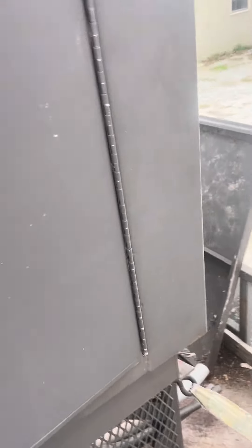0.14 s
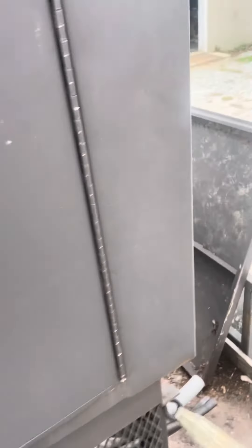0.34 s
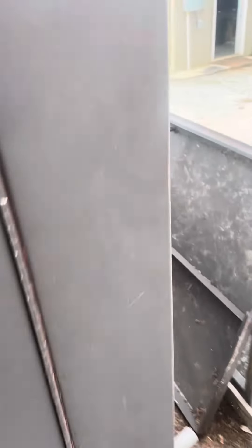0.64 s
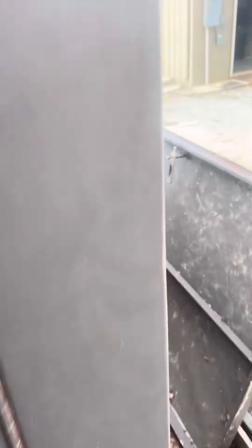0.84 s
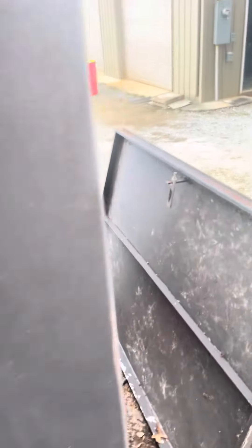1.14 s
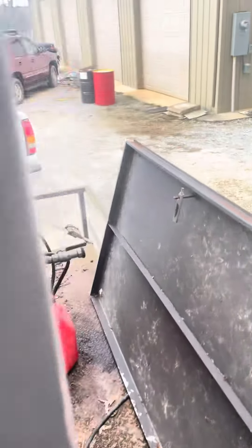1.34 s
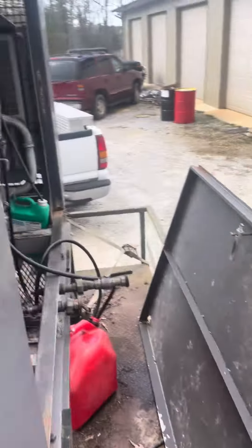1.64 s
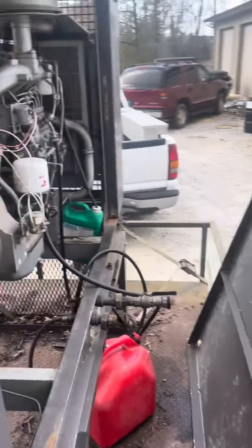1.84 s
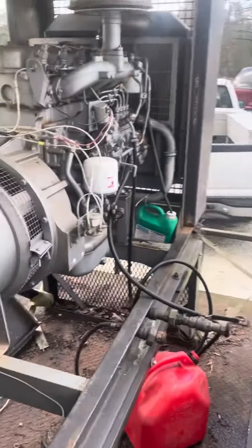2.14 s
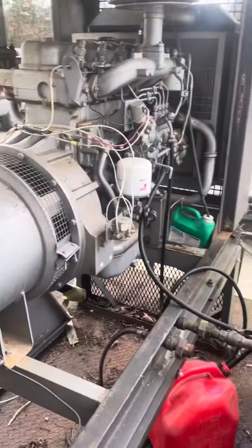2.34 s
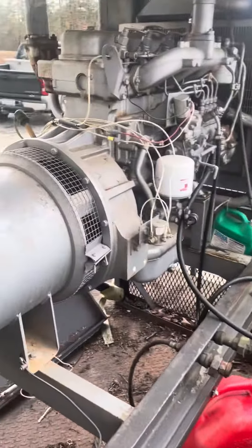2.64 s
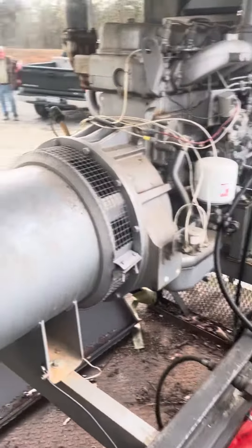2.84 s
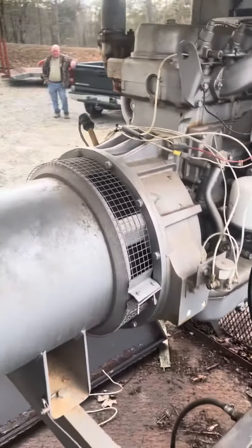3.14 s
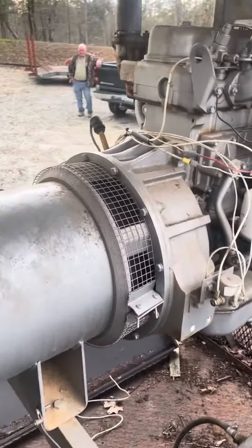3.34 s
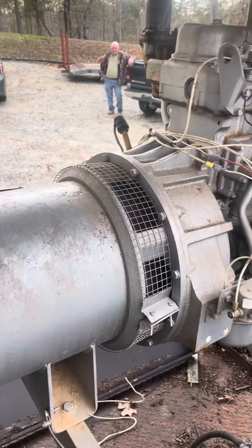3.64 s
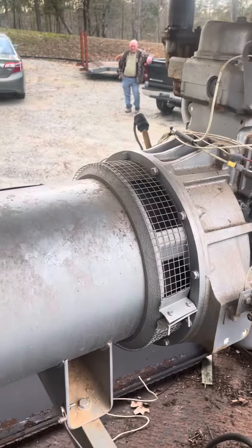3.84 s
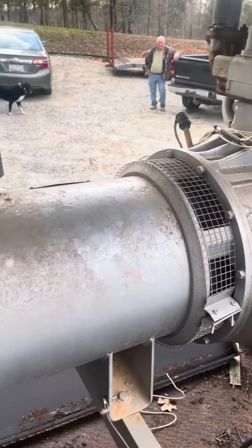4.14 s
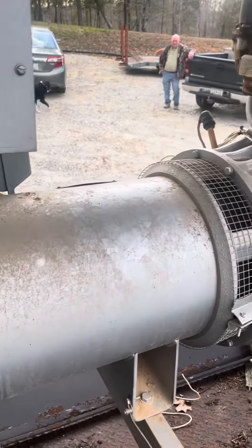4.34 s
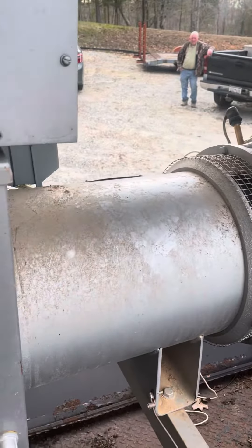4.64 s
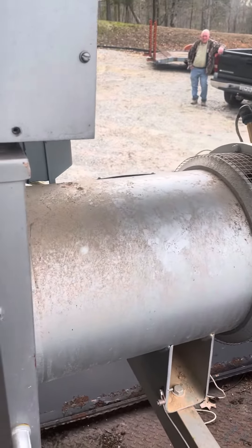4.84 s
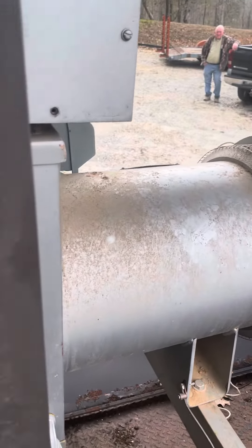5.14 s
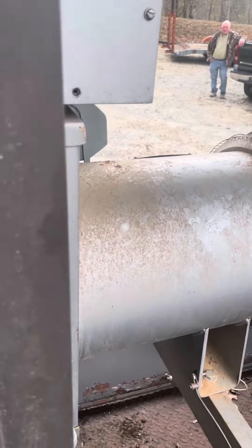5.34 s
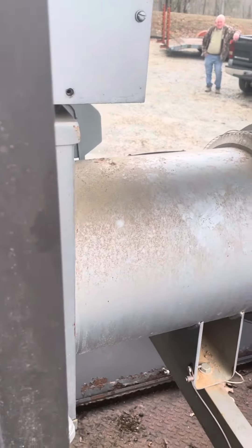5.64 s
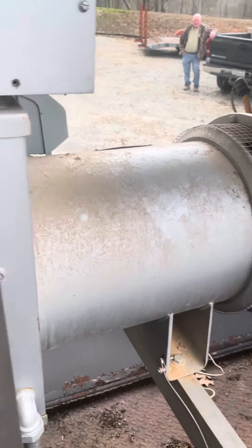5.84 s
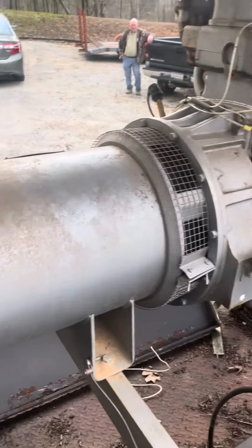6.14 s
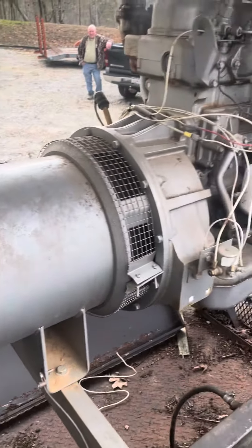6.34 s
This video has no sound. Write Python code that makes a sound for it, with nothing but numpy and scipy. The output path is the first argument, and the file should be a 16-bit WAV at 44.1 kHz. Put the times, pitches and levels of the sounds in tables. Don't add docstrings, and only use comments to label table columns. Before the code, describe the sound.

A diesel generator is already running at a fixed speed, around thirty turns a second, and never stops. From 0 to 1.2 s a steel door partly masks it: a low firing hum near 60 Hz, a fan whine near 370 Hz, dull air roar, and brief thin whistle glints around 4.5 kHz. From about 1.3 to 2 s the listener steps clear; the roar brightens with a rising reflected color and the rapid block clatter opens up. Between 2 and 4 s it is full and close, the whine prominent, with tones dipping and returning. Deep exhaust booms swell at about 2.5 and 3.6 s, strongest from 4 to 5.1 s, while firing hum and whine weaken along the alternator. A barely audible tick falls at 4 s, a slightly firmer one at 6.2 s. The whine recovers somewhat toward the end, and the sound cuts off still running at 6.5 s. Wide outdoor stereo.

```python
import sys
import numpy as np
from scipy import signal
from scipy.fft import rfft, irfft, next_fast_len
from scipy.io import wavfile
from scipy.ndimage import uniform_filter1d, map_coordinates

SR = 44100
rng = np.random.default_rng(int(sys.argv[2]) if len(sys.argv) > 2 else 0)


def int16_out(signal):
    q = np.round(np.clip(np.atleast_2d(signal).T, -1, 1) * 32767)
    wavfile.write(sys.argv[1], SR, q.astype(np.int16))


def makeup_ratio(level_db):
    decades = np.asarray(level_db, float) / 20
    return 10 ** decades


N = 286209
FFT_SIZE = next_fast_len(N + 8192)
HZ = np.arange(FFT_SIZE // 2 + 1) * SR / FFT_SIZE

# [t/s, turns per second/Hz]
SPEED = [(0, 30.59), (1.3, 30.58), (1.6, 30.7), (2.1, 30.56), (2.5, 30.63), (3, 30.59), (5, 30.59),
         (5.6, 30.62), (6.49, 30.62)]
# [t/s, place along the set/m, share of the set hidden by door or frame/0-1]
WALK = [(0, 0.8, 0.9), (.1, 0.3, 1), (.7, -0.03, 0.8), (.98, 0.44, .75), (1.05, -0.7, 0.87),
        (1.279, -.1, 0.5), (1.48, -0.5, 0.15), (2.13, 0.5, .2), (2.8, 1.5, .1), (3.43, 2, 0.05),
        (4.2, 2.5, 0.01), (4.86, 3, 0.04), (5.101, 3.5, .3), (5.73, 3.5, .2), (5.84, 4, 0.3),
        (6.2, 3.5, 0.5), (6.49, 2.9, 0.3)]


def in_time(rows):
    s, *columns = np.transpose(rows)
    return np.array([np.interp(np.arange(N) / SR, s, c) for c in columns])


def drift(rate):
    r = np.exp(-80 * np.pi * rate / SR)
    slow = signal.lfilter([1], [1, -2 * r, r * r], rng.standard_normal(N // 40 + 2002))[2000:]
    return np.interp(np.arange(N) / 40, np.arange(len(slow)), slow / slow.std())


def bump(s, half_s):
    return np.exp(-((np.arange(N) / SR - s) / half_s) ** 2)


def heard_db(place_m, distance_m, hidden_db):
    walker_m, hidden = in_time(WALK)
    return -10 * np.log10(1 + ((walker_m - place_m) / distance_m) ** 2) - hidden_db * hidden


def ports(hz):
    # [f/Hz, level per Hz/dB, left-right/dB, likeness/0-1, left lead/rad]
    set_colour = [(35.7, -69.5, 3, 1, 2.5), (48, -57, 0, 0.65, .0), (75, -47.5, .8, .995, .0),
                  (101, -50, 0, 0.77, 0.7), (131, -54.5, 1, .95, -0.5), (186, -47, -4.5, 0.96, 0.28),
                  (310, -46, -4.5, 0.9, 0.46), (467, -48.5, -3, .72, 1.23), (547, -51, 2.5, 0.7, 1.22),
                  (734, -50.5, -0.2, .74, 1.97), (734, -48, 1.5, .84, 2), (827, -53.5, 3, .66, 2),
                  (1040, -54.5, 2.5, 0.67, 2.5),
                  (1220, -54.5, -1.5, 0.26, 2.98), (1480, -57.5, 2.2, 0.075, 1.8), (1700, -57.5, 3, 0.4, 2),
               (1770, -58.5, 0, 0.41, 2.7), (1883, -63, -5.5, .67, 2.8), (2323, -64, -5.5, 0.22, 2.8),
               (2410, -66, 5, .55, 3.5), (2710, -69, 0.5, 0.67, 2.76), (3360, -73.5, 0, 0.69, 2.97),
               (3724, -74.5, 1, 0.98, 1.6), (4430, -73, 2.5, 0.74, .55), (5270, -77, 3.5, .23, .8),
               (5975, -83, 2.3, .34, 1.1), (6760, -95.5, -1, .35, 1.7),
                  (7200, -99.5, -3, 0.99, 3.13), (8600, -104.5, 0.5, 0.9, 3.13), (9300, -107.5, 3, 0.2, 4.5),
               (10000, -110.5, 6.5, 1, 6.27), (12200, -117.5, -3, .95, 6.27), (13000, -122.5, 1, .95, 3.13),
               (15000, -126.5, -1, 0.95, 3.13)]
    at, db, lean, alike, lead = np.transpose(set_colour)
    columns = (db, lean, np.clip(alike, 0, 1), np.unwrap(lead))
    return [np.interp(np.log(hz + 1), np.log(at), c) for c in columns]


def at_ports(first, second):
    db, lean, alike, lead = ports(HZ)
    right = alike * np.exp(-1j * lead) * first + np.sqrt(1 - alike ** 2) * second
    return makeup_ratio(db) * np.sqrt(SR / 2) * np.array([first * makeup_ratio(lean / 2), right * makeup_ratio(-lean / 2)])


def crank_turns():
    return np.cumsum(in_time(SPEED)[0]) / SR


def hum_db():
    # [level at closest/dB, place/m, distance/m, loss when hidden/dB]
    hum_from = [
        (-24.5, 1.1, 1.2, 5.5),
        (-29, 2.2, 3.0, 3.5),
        (-31, 3.7, 3.5, -3.5),
        (-20.5, 2.11, 0.96, -2.5),
        (-31, 1.1, 4.5, 6),
    ]
    # [t/s, depth/dB, half width/s]
    node_lists = [
        [(3.2, 4, 0.37), (4.32, 10, .15), (5.13, 10, 0.078), (5.67, 13, 0.13)],
        [(.75, 2.5, 0.14), (1.4, 2.5, 0.4), (2.43, 4, 0.24), (4.05, 2, .2)],
        [(.15, 12, .3), (1.62, 20.5, 0.65), (2.3, 3.5, 0.18), (3.55, 6.5, 0.56), (5.35, 4, .2), (6.2, 12, 0.2)],
        [(1.62, 8, 0.17), (2.16, 4.5, 0.22), (5.3, 2, 0.15)],
        [(1.08, 20, 0.23), (1.55, 13.5, .3), (2.43, 5, .12), (3.75, 15.5, .45), (4.9, 6, 0.14)],
    ]
    levels = []
    for (db, *where), nodes in zip(hum_from, node_lists):
        dips_db = sum(depth_db * bump(s, half_s) for s, depth_db, half_s in nodes)
        levels.append(db + heard_db(*where) - dips_db)
    return levels


def orders(turns):
    strong_orders = [
        2,
        4,
        6,
        12,
        16,
    ]
    # [multiple of crank speed, level/dB]
    faint = [(5.0, -45.5), (8.0, -38.5), (10.0, -50), (14.0, -43), (18.0, -44), (30.0, -51), (34.0, -42.5),
             (36.0, -50), (40.0, -49.5)]
    hidden = in_time(WALK)[1]
    rows = list(zip(strong_orders, hum_db()))
    for k, db in faint:
        rows.append((round(2 * k) / 2, db - 1.5 * (hidden - .4) + 1.5 * drift(0.8)))
    out = np.zeros((2, N))
    for (k, db), start in zip(rows, rng.random(len(rows))):
        _, lean, _, lead = ports(k * SPEED[0][1])
        phase = 2 * np.pi * (k * turns + start)
        size = np.sqrt(2) * makeup_ratio(db + 1.1 * drift(2.9))
        left = np.sin(phase) * makeup_ratio(lean / 2)
        right = np.sin(phase - lead) * makeup_ratio(-lean / 2)
        out += size * np.array([left, right])
    return out


def cycle_knocks(turns, change_rate):
    every_turn_share = .55
    whole, half = rng.standard_normal((2, 4, 2, 2880))
    each_turn = np.tile(half[..., :1440], 2)
    faces = np.sqrt(1 - every_turn_share) * whole + np.sqrt(every_turn_share) * each_turn
    at = (turns * 1440).astype(int) % 2880
    shares = np.array([drift(change_rate) for face in faces])
    shares = shares / np.sqrt(np.sum(shares ** 2, axis=0))
    return sum(share * face[:, at] for share, face in zip(shares, faces))


def machine_noise(turns, patchy_db, together_db):
    noise_db, cycle_db = 2.5, -2
    # [place/m, distance from the path/m, loss when hidden/dB]
    parts = [
        (0.83, 4.6, 1.5),
        (2.7, 3.5, 3.5),
        (3, 2.3, 4.5),
        (1.1, 5.5, 3.5),
        (2.3, 3.8, 6),
    ]
    part_hz = [
        260,
        620,
        1400,
        2200,
        4700,
    ]
    rush = rfft(rng.standard_normal((2, FFT_SIZE)))
    knock_share = makeup_ratio(cycle_db) / (1 + (700 / (HZ + 1)) ** 4) / (1 + (HZ / 2600) ** 4)
    knocks = rfft(cycle_knocks(turns, change_rate=0.53), FFT_SIZE)
    both = at_ports(*(rush + knock_share * knocks))
    walk = np.array([heard_db(*part) for part in parts])
    walk = walk - walk.mean(axis=1, keepdims=True)
    low_cut = 1 + (92 / (HZ + 1)) ** 12
    centres = 105 * 2 ** np.arange(0, 7.1, .5)
    throb = drift(20)
    out = 0
    for k, hz in enumerate(centres):
        band = np.interp(np.log(HZ + 1), np.log(centres), np.arange(len(centres)) == k)
        place = np.interp(np.log(hz), np.log(part_hz), np.arange(len(parts)))
        low = min(int(place), len(parts) - 2)
        level = walk[low] + (place - low) * (walk[low + 1] - walk[low])
        flicker = patchy_db * (drift(1.5) + drift(20))
        flicker = flicker + together_db * throb * min(hz / 6000, 1) ** 2
        out = out + makeup_ratio(level + flicker) * irfft(both * band / low_cut, FFT_SIZE)[:, :N]
    return makeup_ratio(noise_db - 3) * out


def chance_field(rows, columns):
    coarse = rng.standard_normal((int(rows.max()) + 2, int(columns.max()) + 2))
    return 1.3 * map_coordinates(coarse, np.meshgrid(rows, columns, indexing="ij"), order=1)


def ground_echo_db(hz, walker_m, hidden):
    off = np.log((hz + 1) / (880 + 45 * walker_m))
    depth_db = (1 + 1.9 * walker_m) * (1 - .6 * hidden)
    return depth_db * (.5 * np.exp(-((off - .27) / 0.06) ** 2) - np.exp(-(off / 0.12) ** 2))


def door_echo_db(hz, s):
    peak_db, peak_hz, at_s, half_s = 4, 308, 1.7, 0.52
    rise, width = 1.5, 0.59
    off = np.log2((hz + 1) / peak_hz) - rise * (s - at_s)
    return peak_db * np.exp(-(off / width) ** 2 - ((s - at_s) / half_s) ** 2)


def moving_echoes(x, broad_s, fine_s, fine_hz):
    # [f/Hz, broad patch/dB, fine patch/dB, share of deep nulls/0-1]
    patches = [(100, .5, 0, 0), (300, 1, .6, 0), (1000, .8, 2, .01), (2300, .7, 2.6, .03),
               (2800, 1.2, 2.4, .16), (3400, 1.2, 2.2, .2), (3900, .7, 1.3, .02), (6200, .6, 1.3, .02),
               (7000, 1, 2.5, .3), (9000, 1, 3, .45), (15000, 1, 3, .5)]
    hz, s, both = signal.stft(np.array([x[0] + x[1], x[0] - x[1]]) / 2, SR, nperseg=2048)
    at, *columns = np.transpose(patches)
    broad, fine, nulls = [np.interp(np.log(hz + 1), np.log(at), c)[:, None] for c in columns]
    when, *walk = np.transpose(WALK)
    walker_m, hidden = [np.interp(s, when, c) for c in walk]
    rows_hz = hz[:, None]
    door = door_echo_db(rows_hz, s)
    ground = ground_echo_db(rows_hz, walker_m, hidden)
    for part, echo_db in enumerate((ground + door, door)):
        cells = rng.random((len(hz) // 4 + 1, len(s) // 2 + 1))
        cells = cells.repeat(4, axis=0).repeat(2, axis=1)[:len(hz), :len(s)]
        null_share = nulls * np.where((rows_hz < 6000) & (part == 1), .3, 1)
        null_db = -26 * (cells < null_share)
        broad_db = broad * chance_field(7 * np.log2(1 + hz / 60), s / broad_s)
        fine_db = fine * chance_field(hz / fine_hz, s / fine_s)
        gain = makeup_ratio(broad_db + fine_db + null_db + echo_db)
        both[part] *= gain / np.sqrt(np.mean(gain ** 2, axis=1, keepdims=True))
    mid, side = signal.istft(both, SR, nperseg=2048)[1][:, :N]
    return np.array([mid + side, mid - side])


def exhaust_flow():
    # [t/s, peak level/dB, half width/s]
    surges = [(.33, -27.5, 0.13), (.96, -34.5, 0.087), (2.2, -32, 0.2), (2.55, -24.5, .06),
              (3.3, -28, 0.073), (3.6, -25, 0.23), (4.08, -20, 0.077), (4.36, -18, .05), (4.55, -21.5, .06),
              (4.8, -27, .06), (4.97, -22, 0.039), (5.11, -22, .06), (5.46, -27, .06), (6.12, -26, 0.2),
              (6.49, -30, 0.053)]
    idle = makeup_ratio(-30 - 8.5 * in_time(WALK)[1])
    surge_power = sum((makeup_ratio(db) * bump(s, half_s)) ** 2 for s, db, half_s in surges)
    return np.sqrt(idle ** 2 + surge_power)


def boom():
    # [f/Hz, width/Hz, level/dB]
    resonances = [
        (69.5, 5.3, -2.5),
        (79, 2.5, 3.5),
        (83, 2.4, -5),
    ]
    peaks = 0
    for k, (hz, width, db) in enumerate(resonances):
        peaks = peaks + makeup_ratio(db) / (1 + 2j * (HZ - hz) / width) * (-1) ** k
    skirt = makeup_ratio(-9.5) / (1 + (58 / (HZ + 1)) ** 5) / (1 + (HZ / 95) ** 8)
    noise = rfft(rng.standard_normal(FFT_SIZE))
    x = irfft(noise * (np.abs(peaks) ** 2 + skirt), FFT_SIZE)[:N]
    even = np.sqrt(uniform_filter1d(x ** 2, SR // 3))
    return exhaust_flow() * x / even * makeup_ratio([[.4], [-.4]]) 


def whistle():
    whistle_hz, whistle_db, edge_s = 4452, -66, .015
    # [start t/s, length/s, level/dB]
    glints = [(-.02, .065, -47), (.097, .09, -49), (.24, .075, -48), (.42, .05, -59), (.745, .035, -57),
              (.845, .045, -57), (.94, .045, -56), (1.18, .14, -60), (6.2, .4, -65)]
    t = np.arange(N) / SR
    size = makeup_ratio(whistle_db)
    for s, length, db in glints:
        size = size + makeup_ratio(db) * np.clip(np.minimum(t - s, s + length - t) / edge_s, 0, 1)
    phase = 2 * np.pi * np.cumsum(whistle_hz + 6 * drift(11.0)) / SR
    sides = np.array([np.sin(phase) * makeup_ratio(0.5), np.sin(phase - .6) * makeup_ratio(-2.2)])
    return np.sqrt(2) * size * makeup_ratio(.8 * drift(9)) * sides


def ticks():
    # [t/s, peak level/dB]
    taps = [
        (4.02, -62),
        (6.21, -54),
    ]
    out, t = np.zeros(N), np.arange(300) / SR
    for (s, db), grit in zip(taps, rng.standard_normal((len(taps), 300))):
        out[round(s * SR):][:300] += makeup_ratio(db) * grit * np.exp(-t / .0015)
    bright = signal.butter(3, [7000, 12500], "band", fs=SR, output="sos")
    return signal.sosfilt(bright, out) * makeup_ratio([[-2], [2]])


def rumble():
    band = signal.butter(3, [33, 50], "band", fs=SR, output="sos")
    x = signal.sosfilt(band, rng.standard_normal(N + SR))[SR:]
    return makeup_ratio(-52.5 + heard_db(place_m=2.5, distance_m=3.0, hidden_db=5)) * x / x.std()


def scene():
    turns = crank_turns()
    noise = machine_noise(turns, patchy_db=.4, together_db=.9)
    noise = moving_echoes(noise, broad_s=0.356, fine_s=.045, fine_hz=108.7)
    return orders(turns) + noise + boom() + whistle() + ticks() + rumble()


def band_limit(x):
    return signal.sosfilt(signal.butter(12, 15100, fs=SR, output="sos"), x)


def record(dry):
    fade = np.sin(np.pi / 2 * np.minimum(1, (N - np.arange(N)) / 220)) ** 2
    return band_limit(4 * np.tanh(dry * fade / 4))


dry = scene()
out = record(dry)
int16_out(out)
```